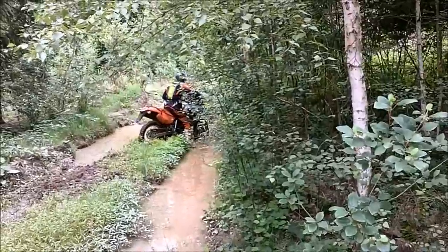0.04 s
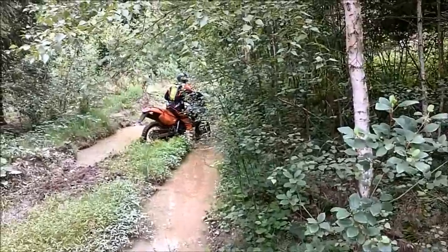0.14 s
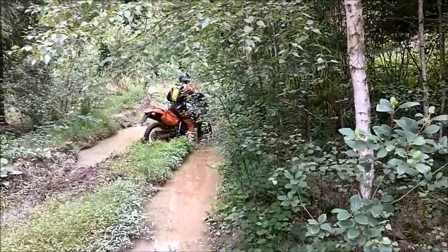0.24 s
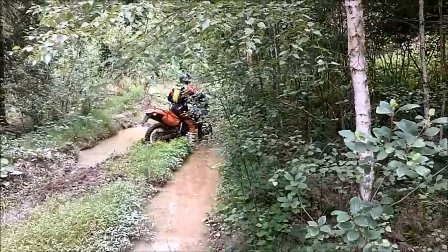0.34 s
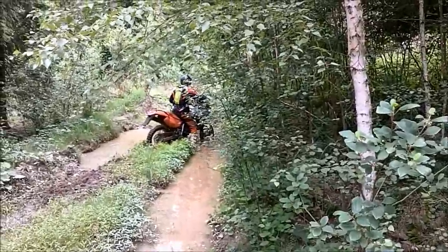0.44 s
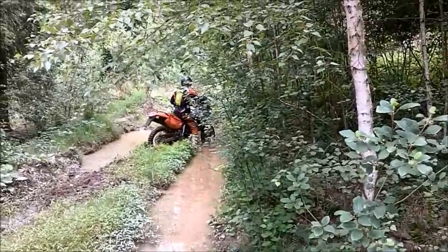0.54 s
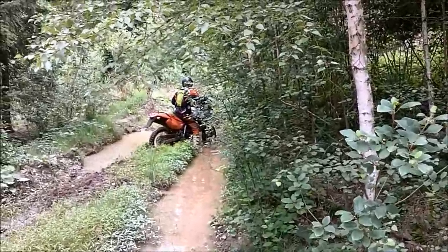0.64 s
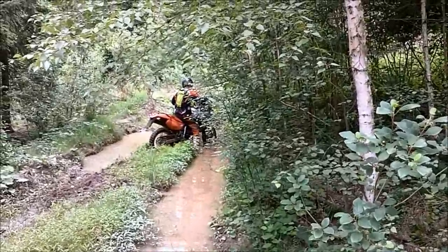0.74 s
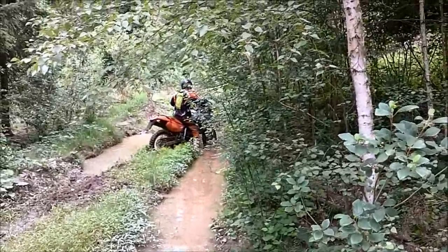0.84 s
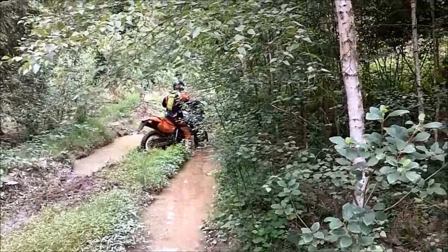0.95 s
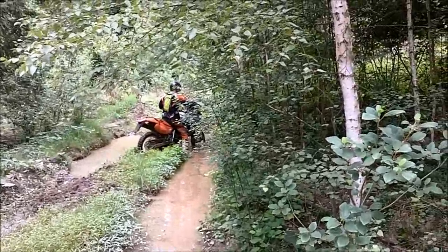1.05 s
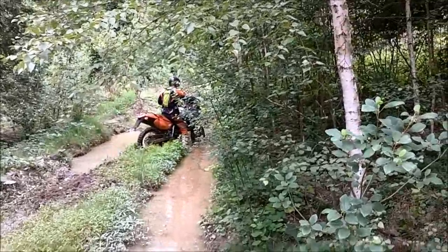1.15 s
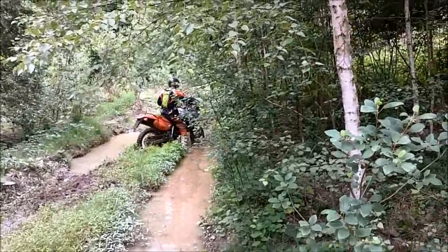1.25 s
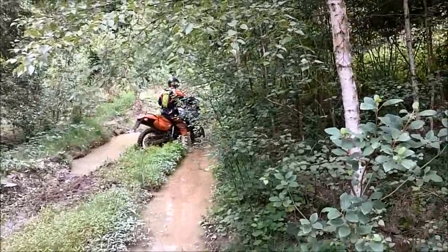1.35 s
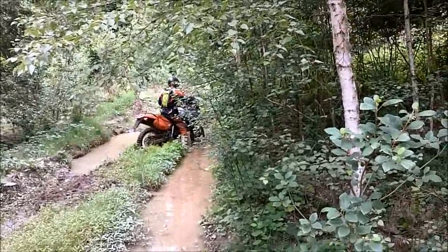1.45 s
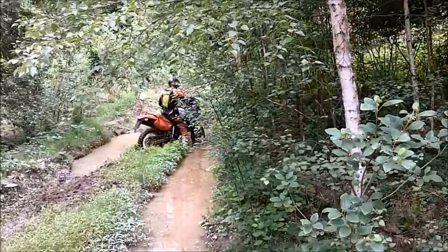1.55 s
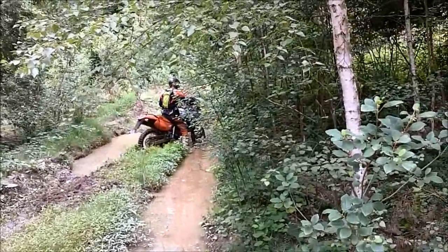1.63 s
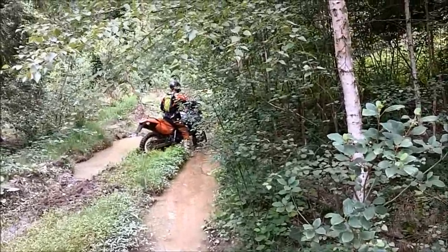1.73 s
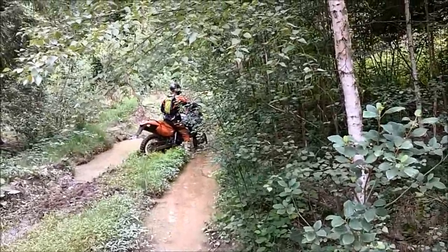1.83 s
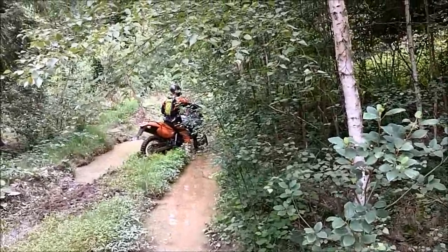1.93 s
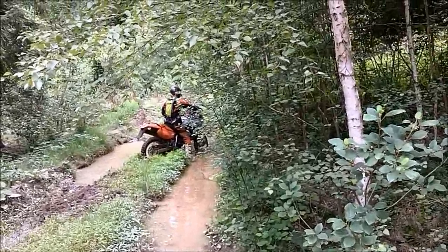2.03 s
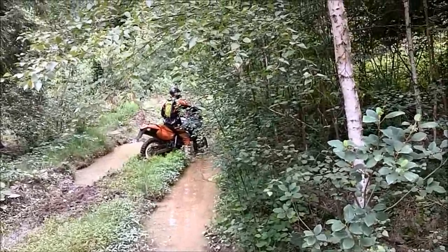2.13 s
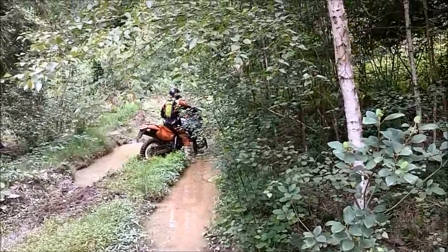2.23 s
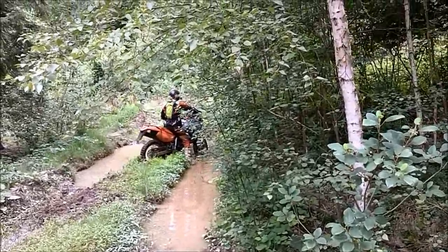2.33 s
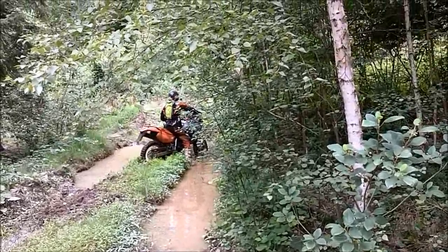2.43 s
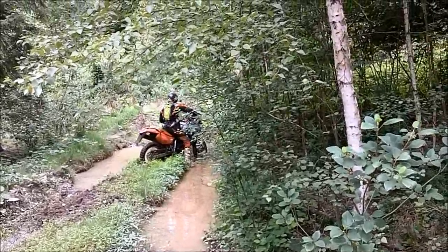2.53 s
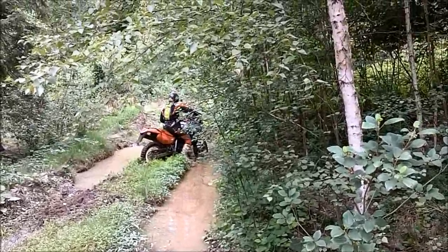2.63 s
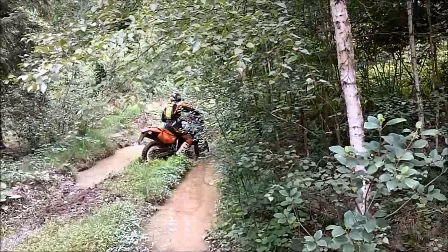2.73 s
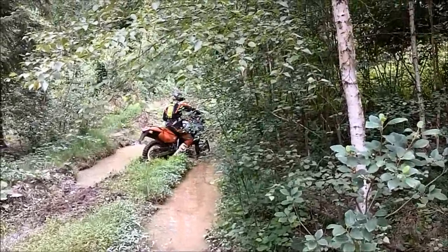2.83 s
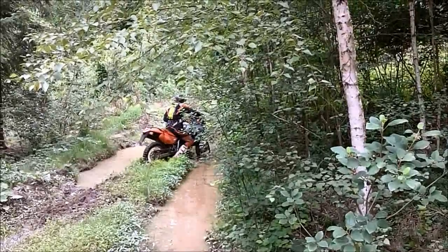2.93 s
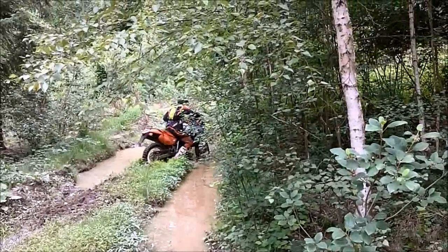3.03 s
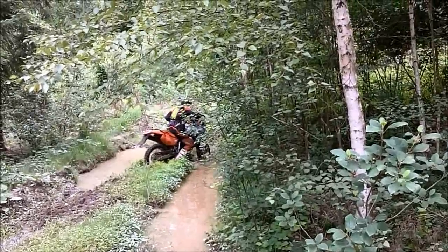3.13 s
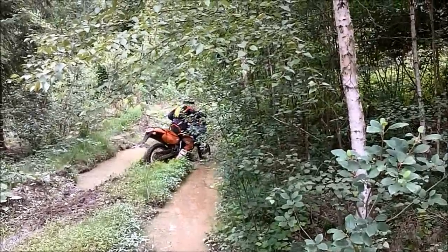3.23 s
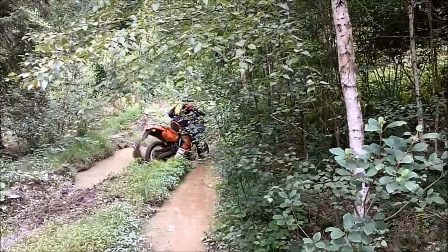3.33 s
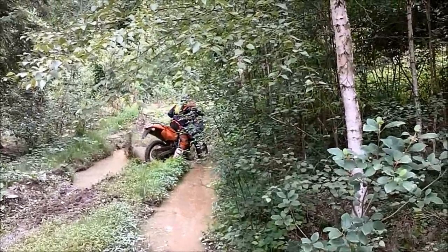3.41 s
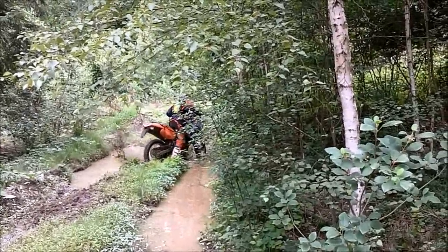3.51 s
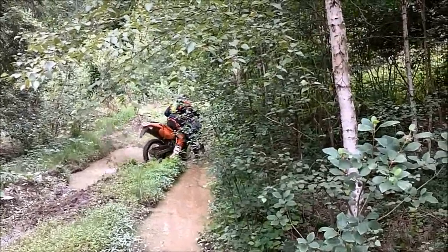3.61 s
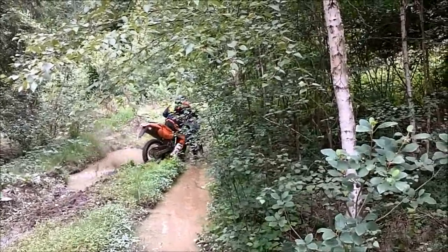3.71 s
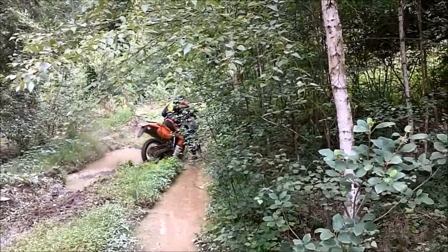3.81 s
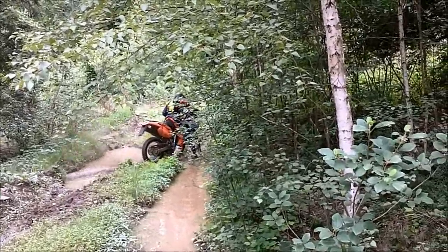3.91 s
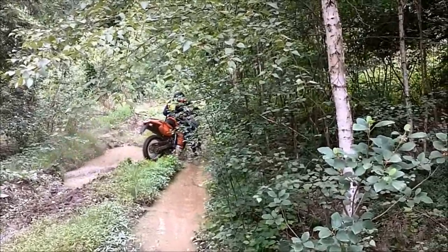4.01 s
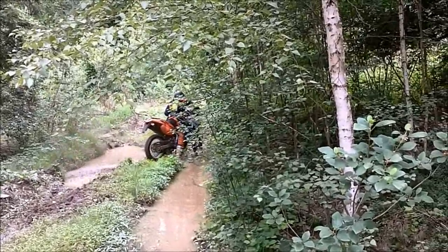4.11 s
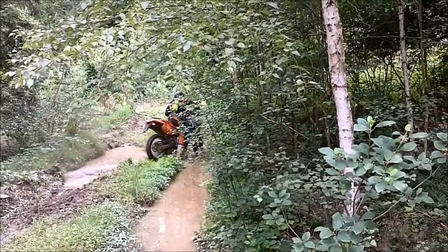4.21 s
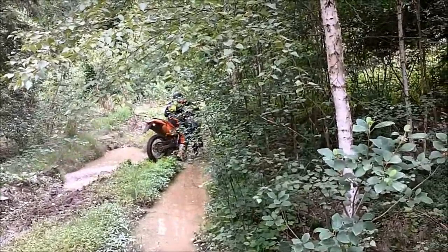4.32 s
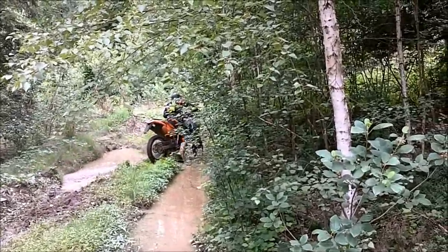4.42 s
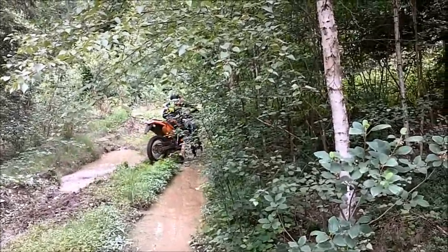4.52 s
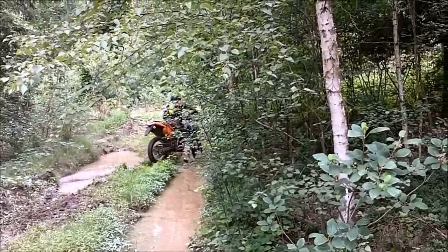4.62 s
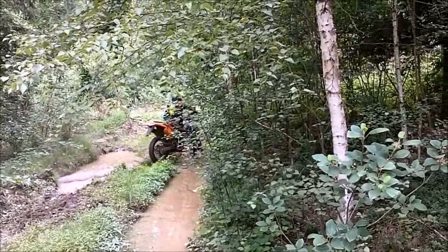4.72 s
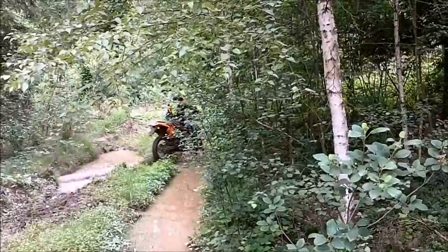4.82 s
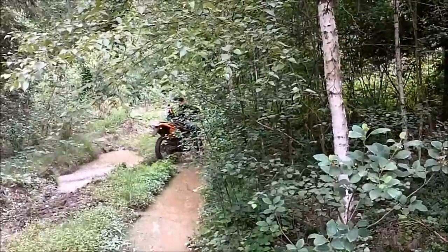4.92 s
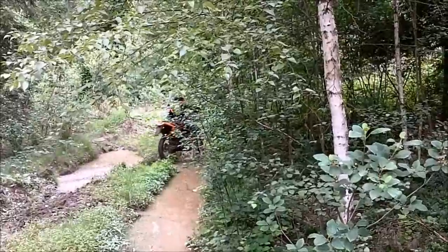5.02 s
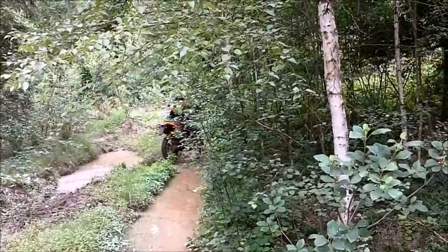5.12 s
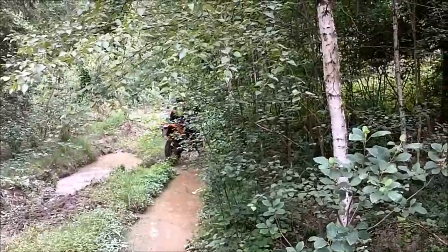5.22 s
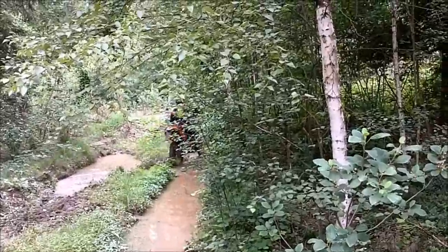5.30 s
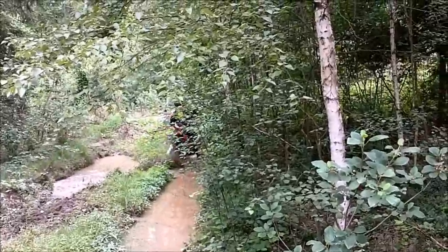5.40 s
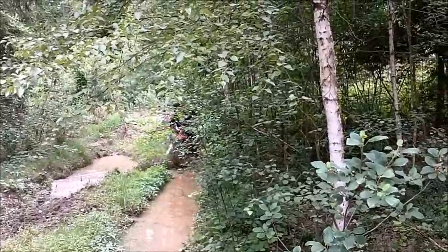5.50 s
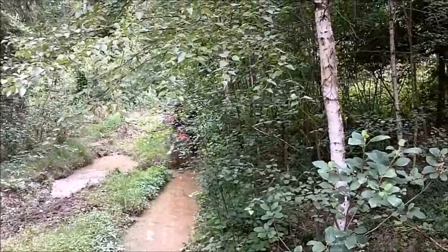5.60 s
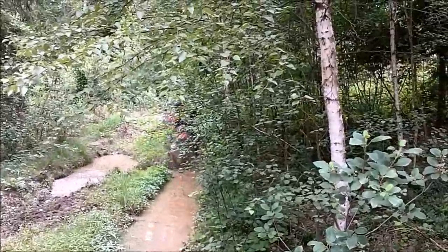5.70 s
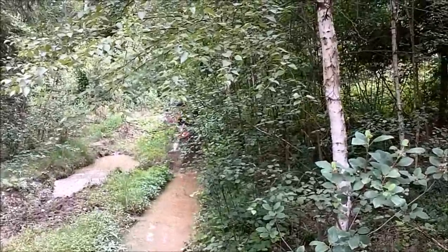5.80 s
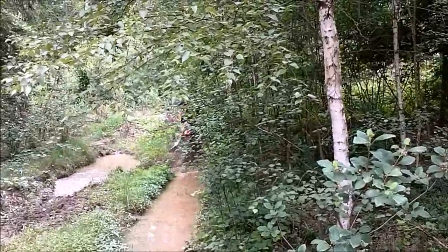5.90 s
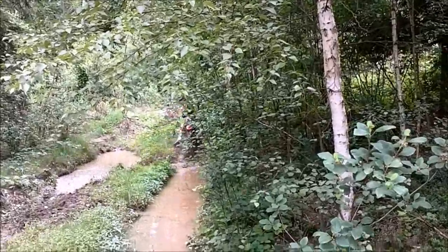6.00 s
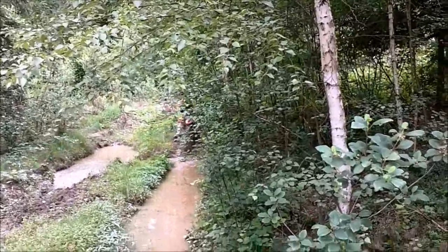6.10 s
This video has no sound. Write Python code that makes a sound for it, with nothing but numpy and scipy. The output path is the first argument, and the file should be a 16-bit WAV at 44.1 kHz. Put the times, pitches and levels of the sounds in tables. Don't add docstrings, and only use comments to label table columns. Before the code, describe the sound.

A trail bike stuck in mud some distance away restarts: soft rustling leaves first, then a brief metallic starter whirr, heavy isolated exhaust thuds, and a burst of barking revs. The engine pulls up into a steady buzzing drone with valve clatter and rushing noise, sags, then slackens into separate lumpy beats at the end. Open woodland with short diffuse reflections; small camera microphone, midrange-heavy, notched and muffled on top.

```python
import sys
import numpy as np
from scipy import signal
from scipy.fft import rfft, irfft, next_fast_len
from scipy.io import wavfile
from scipy.ndimage import uniform_filter1d

SR = 44100
rng = np.random.default_rng(int(sys.argv[2]) if len(sys.argv) > 2 else 0)


def unload_audio(sound):
    columns = np.transpose(np.atleast_2d(sound))
    steps = np.round(np.clip(columns, -1, 1) * 32767)
    wavfile.write(sys.argv[1], SR, steps.astype(np.int16))


def decibels_to_gain(level_db):
    exponent = np.asarray(level_db, float) / 20
    return 10 ** exponent


N = 271215
T = np.arange(N) / SR


def unit(x):
    return x / np.sqrt(np.mean(x ** 2) + 1e-20)


def along(points, hz):
    f, v = np.transpose(points)
    return np.interp(np.log(hz + 1), np.log(f + 1), v)


def levels(rows, fade_s=.004):
    s, lead_db, *rest_db = np.transpose(rows)
    inside = np.clip(np.minimum(T - s[0], s[-1] - T) / fade_s + .5, 0, 1)
    layers_db = [lead_db] + [lead_db + r for r in rest_db]
    return [inside * decibels_to_gain(np.interp(T, s, db)) for db in layers_db]


def filtered(x, response):
    m = next_fast_len(N + SR // 2)
    return irfft(rfft(x, m) * response(np.fft.rfftfreq(m, 1 / SR)), m)[:N]


def resonant(modes):
    return lambda f: 1 + sum(decibels_to_gain(db) * 1j * f * w / (c * c - f * f + 1j * f * w) for c, w, db in modes)


def wander(size):
    return unit(uniform_filter1d(rng.standard_normal(N), size=size))


def band(lo_hz, hi_hz, patchy_db, spiky_db=0):
    z = signal.stft(rng.standard_normal(N + 512), nperseg=512)[2]
    field = uniform_filter1d(uniform_filter1d(rng.standard_normal(z.shape), 5, 0), 6, 1)
    x = signal.istft(z * decibels_to_gain(patchy_db * unit(field)), nperseg=512)[1][:N]
    x = x * decibels_to_gain(spiky_db * wander(60))
    edges = lambda f: 1 / np.sqrt((1 + (lo_hz / (f + 1)) ** 6) * (1 + (f / hi_hz) ** 6))
    return unit(filtered(x, edges))


def leaves():
    # t/s, rustle level/dB, soft rustle re rustle/dB, wind re rustle/dB
    gusts = [(0.0, -65, 4, -20), (0.028, -61.5, -5, -15), (0.062, -67.5, 1, -8), (0.138, -63.5, -3.5, -11),
             (0.33, -67.5, 1, -7), (0.35, -61.5, 2, -27), (0.392, -69, 2.5, 0), (0.412, -60.5, -4, -23),
             (0.478, -71.5, 5.5, 2), (0.522, -67.5, 3, -7), (0.676, -71.5, 6.5, -3), (0.72, -65.5, 0.5, -6),
             (0.914, -69.5, 1, -7), (1.06, -71.5, 6.5, 3)]
    held = [(-1, *gusts[0][1:])] + gusts + [(9, *gusts[-1][1:])]
    rustle, soft, wind = levels(held)
    crisp = decibels_to_gain(-1.5) * band(3400, 4900, 2.7, spiky_db=2.5) + decibels_to_gain(6) * band(6500, 16000, 1.5)
    breath = band(60, 320, 2.7) + decibels_to_gain(6.5) * band(12, 49, 1.7)
    return rustle * crisp + soft * band(214, 2200, 2.5) + wind * breath


def woods(x):
    # f/Hz, t60/s
    decay = [(100, 0.12), (1000, 0.48), (8000, 0.35)]
    hz, t, z = signal.stft(rng.standard_normal(SR // 2), SR, nperseg=256)
    tail = signal.istft(z * decibels_to_gain(-60 * t / along(decay, hz)[:, None]), SR, nperseg=256)[1]
    delayed = np.pad(x, (600, 0))
    return signal.fftconvolve(delayed, tail / np.linalg.norm(tail))[:N]


def starter():
    # t/s, whirr level/dB, grind re whirr/dB, fizz re whirr/dB
    strokes = [
        [(1.078, -78, -2, -21), (1.084, -44, -14, -22), (1.096, -50, 2, -22), (1.286, -37, -7.5, -22.5),
         (1.298, -42, -3, -19), (1.344, -41, -3.5, -21), (1.36, -56, -7, -28)],
        [(1.36, -56, 3, -19), (1.402, -54, 0, -17)],
        [(1.402, -46, -2, -20), (1.41, -38.5, -5.5, -16), (1.46, -43, 1.5, -14), (1.53, -55, -6, -24.5),
         (1.54, -46, -4, -18)],
        [(1.54, -59, -8, -22), (1.548, -30.5, -6.5, -17), (1.586, -45, 1.5, -21), (1.63, -62, 1, -22)],
    ]
    # t/s, f/Hz, level/dB
    whine = [
        [(1.15, 877, -54), (1.19, 944, -50), (1.235, 1130, -53), (1.31, 1130, -46), (1.345, 1150, -60)],
        [(1.42, 1176, -60), (1.435, 1238, -49), (1.455, 1140, -40), (1.49, 1040, -64)],
    ]
    # f/Hz, width/Hz, level/dB
    housing = [(608, 92, -6), (1520, 60, 4), (1660, 60, 9), (3410, 90, 7), (3760, 60, 3), (4880, 70, 2)]
    whirr, grind, fizz = (sum(layer) for layer in zip(*[levels(rows) for rows in strokes]))
    gears = decibels_to_gain(-3.5) * whirr * band(1900, 5700, 2.0, spiky_db=3.5)
    gears = gears + grind * band(560, 3400, 0.83, spiky_db=0.5)
    x = decibels_to_gain(-3.0) * filtered(gears, resonant(housing))
    x = x + decibels_to_gain(24) * fizz * band(6700, 12000, .8, spiky_db=2.5)
    x = x + decibels_to_gain(-25.5) * grind * band(40, 400, 2.8)
    relay_s = 1.083
    clack = decibels_to_gain(-48 - 60 * (T - relay_s).clip(0) / 0.044) * (T > relay_s)
    x = x + clack * band(2900, 9000, 1.1)
    for rows in whine:
        s, hz, db = np.transpose(rows)
        drift = 1 + .03 * wander(200)
        grit = decibels_to_gain(3 * wander(250))
        phase = 2 * np.pi * np.cumsum(np.interp(T, s, hz) * drift) / SR
        x = x + 1.6 * grit * levels(np.transpose([s, db]))[0] * np.sin(phase)
    return x


def firings():
    # t/s, thump level/dB, bark re thump/dB, throttle [0-1]
    lumps = [(1.529, -48, -16.9, 0.1), (1.5561, -39, -13.9, 0.1), (1.6094, -27.7, -21, 0.38),
             (1.7016, -23, -26, 0.35), (1.7764, -22.5, -29, 0.36), (1.8499, -27.4, -19, 0.12),
             (1.9292, -23.5, -28, 0.3), (2.0054, -29.5, -21, 0.2), (2.0875, -23.5, -37, 0.3),
             (2.1653, -24.8, -22, 0.17), (2.2441, -22.5, -24, 0.25), (2.3051, -21.5, -4.5, 0.7),
             (2.3483, -22, -1.7, 0.75), (2.3834, -20.5, -3, 0.9), (2.4146, -23, -1, 0.8),
             (2.4441, -23.5, -5, 1), (2.4791, -21.5, -9.7, 0), (2.5097, -21.5, -10, 0.45),
             (2.5385, -26.5, -2.5, 0.3), (2.5751, -22, -10.8, 0), (2.6102, -24.5, -7, 0),
             (2.6408, -24, -14.0, 0.85), (2.6783, -26.5, -3, 1), (2.7132, -25.5, -3, 1),
             (2.7458, -24.5, -6, 1), (2.7763, -26, -2, 0.96), (2.8063, -25.5, -4, 1),
             (2.8395, -24.5, -3.5, 0.3), (2.8706, -20, -13, 0.47), (2.9017, -28.5, -5, 0.3),
             (2.933, -24.5, -9, 0.8), (5.6856, -19, -3.5, 0.25), (5.7118, -27, -13, 0.64),
             (5.7419, -20, -5.5, 0.36), (5.7714, -22.5, -2, 0.4), (5.8015, -19.5, -11, 0.7),
             (5.8299, -25.5, -9.9, 0.2), (5.8651, -27, -14, 0.4), (5.9007, -24.5, -16, 1),
             (5.9414, -24, -8.5, 0.75), (5.9832, -24, -11, 1), (6.0258, -23.5, -10, 0.86),
             (6.069, -25, -7.5, 1), (6.1132, -23, -8, 0.9)]
    # t/s, firings so far [count]
    crank = [(2.967, 0), (3.0, 1), (3.0309, 2), (3.145, 6), (3.2059, 8), (3.2736, 10), (3.3444, 12),
             (3.4103, 14), (3.5233, 18), (3.5723, 20), (3.7036, 26), (3.7826, 30), (3.9633, 40),
             (4.2312, 56), (4.2972, 60), (4.471, 70), (4.6556, 80), (4.8139, 88), (4.876, 91),
             (5.0778, 100), (5.1489, 103), (5.2223, 106), (5.2955, 109), (5.3892, 113), (5.4618, 116),
             (5.5574, 120), (5.6059, 122), (5.6566, 124)]
    # t/s, thump level/dB, bark re thump/dB, throttle [0-1]
    pull = [(2.95, -32, -13, 0.9), (2.96, -31, -9.5, 1), (3.07, -31, -1, 0.9), (3.46, -28.5, -2.5, 0.8),
            (3.59, -28, -3.5, 0.5), (3.84, -24.5, -8.5, 1), (4.36, -25, -12.5, 0.72), (4.56, -24.5, -10, 1),
            (5.2, -31.5, 0.5, 1), (5.39, -28, 0, 0.8), (5.64, -35, 5, 0.4), (5.67, -37, -5, 0.7)]
    s, k = np.transpose(crank)
    n = np.arange(k[-1] + 1)
    i = np.clip(np.searchsorted(k, n, "right") - 1, 0, len(k) - 2)
    span, rise, slope = np.diff(k)[i], np.diff(s)[i], np.gradient(s, k)
    u = (n - k[i]) / span
    bend = u * (1 - u) * ((1 - u) * (slope[i] * span - rise) - u * (slope[i + 1] * span - rise))
    at = s[i] + u * rise + bend
    when, thump, bark, throttle = np.transpose(pull)
    per_firing_db = 10 * np.log10(np.gradient(at)) + 21
    scatter_db = rng.standard_normal((len(n), 2)) * [.6, 1.2]
    thump_db = np.interp(at, when, thump) + per_firing_db + scatter_db[:, 0]
    bark_db = np.interp(at, when, bark) + 3 + scatter_db[:, 1]
    run = [at, thump_db, bark_db, np.interp(at, when, throttle)]
    rows = np.vstack([lumps, np.transpose(run)])
    return rows[np.argsort(rows[:, 0])]


def clatter(rows):
    # t/s, hiss level/dB, rattle re hiss/dB, fizz re hiss/dB
    noise = [(1.6, -49.5, 0.5, -24), (2.13, -48.5, 0.5, -23), (2.22, -55.5, 6, -25),
             (2.23, -41.5, -2.5, -26), (2.28, -50.5, 0.5, -25), (2.31, -35.5, -3, -26), (2.33, -44, 1, -24),
             (2.35, -33.5, -1.5, -22.5), (2.37, -44, 3, -21), (2.38, -35.5, -1, -28),
             (2.41, -38.5, 3.5, -24), (2.65, -43, 3, -24), (2.88, -38.5, 0.5, -27), (2.93, -46, 5, -21),
             (3.08, -38, 2.5, -23.5), (3.09, -34, 0, -31), (3.11, -40, 5, -21), (3.23, -41, 1, -25),
             (3.25, -36.5, 4, -24), (3.26, -52.5, 6, -16), (3.28, -38, 5, -23), (3.3, -42, -3, -20),
             (3.31, -31, 1.5, -24), (3.32, -38.5, 0.5, -22), (3.37, -34.5, 0, -24.5), (3.55, -32, 0, -23),
             (3.85, -32, -3, -25.5), (3.88, -30.5, -6, -28), (3.96, -32.5, -2.5, -27),
             (4.1, -30.5, -8, -28), (4.18, -32.5, -5, -26.5), (4.81, -31, -2, -24.5),
             (4.96, -30.5, -6.5, -25.5), (4.98, -26.5, -6.5, -28), (5.0, -31.5, -2.5, -27),
             (5.14, -30, -2, -23.5), (5.27, -33, -0.5, -25), (5.57, -32, -2, -23.5), (5.82, -44.5, 2, -21),
             (6.14, -44.5, -1, -18.5), (6.15, -50, 6, -7)]
    # f/Hz, width/Hz, level/dB
    cases = [(940, 110, -4.5), (1128, 40, -6), (1587, 180, -9.5), (1894, 45, -8.5)]
    cycle = np.interp(T, rows[:, 0], np.arange(len(rows)))
    swell = lambda depth_db, at: decibels_to_gain(depth_db * np.cos(2 * np.pi * (cycle - at)))
    hiss, rattle, fizz = levels(noise)
    knock = filtered(band(770, 2600, 1.8, spiky_db=1.5) * swell(1.67, 0.15), resonant(cases))
    rumble = band(146, 790, 2.0) * swell(1.2, 0.41)
    rush = unit(band(2300, 6600, 1.1, spiky_db=1.5) * swell(1.44, 0.23))
    spray = unit(band(6100, 17800, 1.0, spiky_db=1.5) * swell(1.04, 0.21))
    sucking = (T > 1.6) * np.interp(T, [2.25, 2.32], [1, 0]) * decibels_to_gain(-50.5) * band(11000, 12000, .8)
    body = rattle * (unit(knock) + decibels_to_gain(-6.5) * rumble)
    return sucking + decibels_to_gain(-1) * hiss * rush + body + decibels_to_gain(27) * fizz * spray


def exhaust(rows):
    # f/Hz, level/dB, t60/s, lag/ms
    cool_pipe = [(57.3, -8, 0.11, 4), (109.6, 2, 0.38, 3), (195, -10.5, 0.093, 1.5)]
    # f/Hz, level/dB, t60/s, lag/ms
    hot_pipe = [(62, -13, .2, -1.5), (134, -2, 2, .6), (402, -16, .3, .6)]
    # f/Hz, level/dB, t60/s, lag/ms
    closed_pipe = [(118.1, -8.5, 0.29, 2.5), (57.3, -8, 0.23, -1.5)]
    # f/Hz, level/dB, t60/s, lag/ms
    tailpipe = [(294, -12, 0.036, 0.44), (421.2, -13.5, 0.048, 0.59)]
    # lag/ms, level/dB
    echoes = [(0, 0), (7.3, -10), (12.6, -8), (19.4, -18)]
    # f/Hz, level/dB, t60/s, lag/ms
    valve_knock = [(640, -2, .04, 3), (900, -3, .06, 4), (1100, 0, .09, 5), (1330, -5, .05, 4),
                   (1560, -3, .06, 6)]
    # t/s, firing rate/Hz, levels of orders 1 to 4/dB
    orders = [(3.5, 38.3, -38, -32, -41, -36), (3.57, 41.7, -32, -31, -56, -30),
              (3.7, 48.5, -34, -29, -54, -40), (3.79, 52.5, -33, -28.5, -56, -51),
              (3.9, 56.9, -32.5, -28, -48, -46), (4.18, 61.5, -33.5, -28.5, -53, -50),
              (4.36, 58.4, -34, -26, -56, -44), (4.61, 53.2, -31.5, -29, -65, -71),
              (4.72, 50.7, -34, -29.5, -59, -50), (4.94, 45.4, -34.5, -31, -60, -37),
              (5.2, 41.0, -36.5, -36.5, -40, -37), (5.36, 42.5, -35, -32.5, -44, -37),
              (5.56, 40.7, -35, -35.5, -46, -37.5), (5.66, 39.5, -36, -41, -46, -55)]
    # multiple of firing rate [-], level/dB
    mesh = [(14, -55), (18, -54), (21, -55)]

    s, thump_db, bark_db, throttle = rows.T
    throttle = np.clip(throttle, 0, 1)
    lead_s = .01
    t = np.arange(SR // 3) / SR - lead_s
    starts = np.round((s - lead_s) * SR).astype(int)
    train = lambda size, shape: signal.fftconvolve(np.bincount(starts, size, N), shape)[:N]
    dip = lambda ms, width_ms: -np.exp(-.5 * ((1000 * t - ms) / width_ms) ** 2)
    late = lambda ms: np.maximum(t - ms / 1000, 0)
    mode = lambda hz, db, t60, ms: decibels_to_gain(db - 60 * late(ms) / t60) * np.sin(2 * np.pi * hz * late(ms))
    ring = lambda modes: sum(mode(*row) for row in modes)

    shut = ring(cool_pipe) * decibels_to_gain(-60 * late(15.3) / 0.03) + ring(closed_pipe) + decibels_to_gain(1) * dip(0, 0.98)
    opened = ring(hot_pipe) * decibels_to_gain(-60 * late(16) / .025)
    opened = opened + decibels_to_gain(-10) * ring(closed_pipe) + decibels_to_gain(-4) * dip(0, 1.05)
    single = train(decibels_to_gain(thump_db) * (1 - throttle), shut) + train(decibels_to_gain(thump_db) * throttle, opened)

    blast = sum(decibels_to_gain(db) * dip(ms, 0.63) for ms, db in echoes) + ring(tailpipe)
    barks = train(decibels_to_gain(thump_db + bark_db + 7), blast)
    barks = filtered(barks, lambda f: 1 / np.sqrt(1 + (f / 600) ** 8))
    crack = band(980, 6000, 1.8) * train(decibels_to_gain(thump_db + bark_db), (t > 0) * decibels_to_gain(-60 * t / 0.049))
    speed = np.gradient(np.arange(len(s)), s) / 50
    knocks = train(decibels_to_gain(-38) * throttle * speed, ring(valve_knock))

    when, _, *order_db = np.transpose(orders)
    merged = np.interp(T, [3.5, 3.66, 5.62, 5.67], [0, 1, 1, 0])
    cycle = 2 * np.pi * np.interp(T, s, np.arange(len(s)))
    drone = 0
    for k, db, lag_rad in zip((1, 2, 3, 4), order_db, (-1.2, 0, 0, 0)):
        drone = drone - 1.4 * decibels_to_gain(np.interp(T, when, db)) * np.cos(k * (cycle - lag_rad))
    for k, db in mesh:
        drone = drone + decibels_to_gain(db + 3 * wander(3000)) * np.sin(k * cycle)
    upper = filtered(barks, lambda f: 1 / np.sqrt(1 + (215 / (f + 1)) ** 12))
    fused = drone + decibels_to_gain(.5) * upper
    return (1 - merged) * (single + barks) + merged * fused + knocks + decibels_to_gain(-13.5) * crack


def scene():
    rows = firings()
    bike = exhaust(rows) + clatter(rows) + starter()
    bright = filtered(bike, lambda f: 1j * f / (1j * f + 400))
    return (bike + decibels_to_gain(-13.5) * woods(bright) + leaves())[None]


def roll_off(x):
    return signal.sosfilt(signal.butter(12, 15170, fs=SR, output="sos"), x)


def record(dry):
    # f/Hz, level/dB
    capsule = [(500, -2), (720, -3), (1000, -3), (2300, 1.5), (3200, 3.5), (4300, 6.5), (4950, 4),
               (5060, -2), (5800, -11), (7200, -20), (10000, -18), (12050, -31), (13300, -28),
               (15000, -36.5)]
    # f/Hz, width/Hz, depth/dB
    notches = [(2712, 1095, -37), (5506, 720, -26), (7930, 2360, -31), (10800, 820, -35)]

    def response(f):
        h = decibels_to_gain(along(capsule, f)) * 1j * f / (1j * f + 12)
        for c, w, db in notches:
            h = h * (c * c - f * f + 1j * f * w * decibels_to_gain(db)) / (c * c - f * f + 1j * f * w)
        return h

    x = filtered(dry[0], response)
    x = x + decibels_to_gain(-87.5) * band(11000, 16000, .3)
    return roll_off(x[None])


dry = scene()
out = record(dry)
unload_audio(out)
```